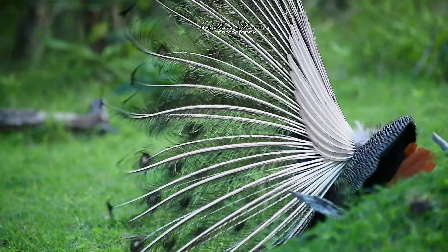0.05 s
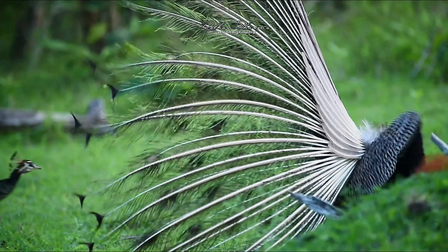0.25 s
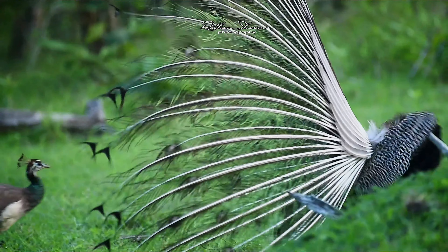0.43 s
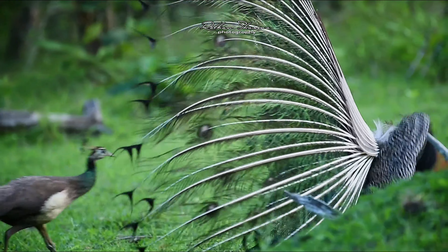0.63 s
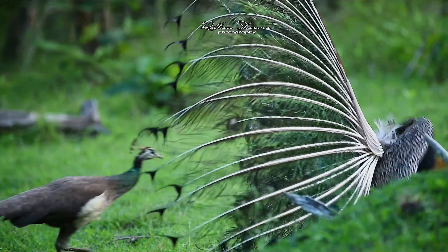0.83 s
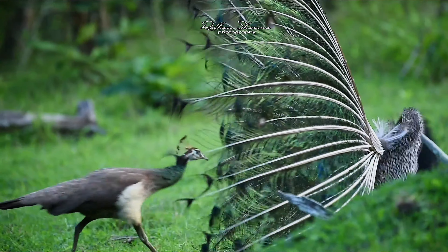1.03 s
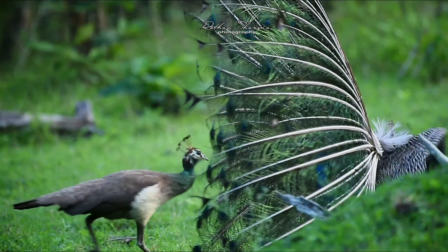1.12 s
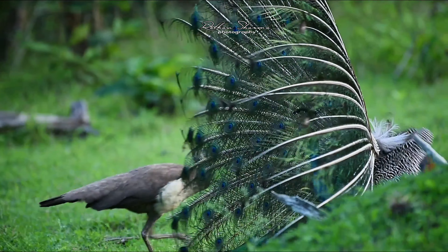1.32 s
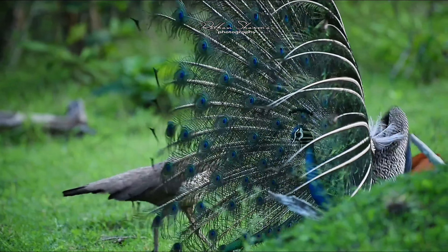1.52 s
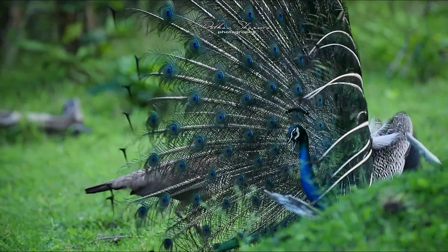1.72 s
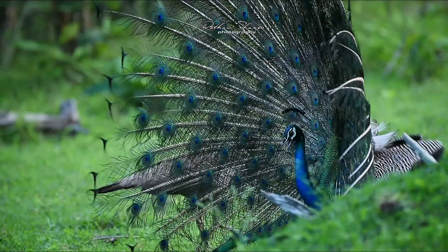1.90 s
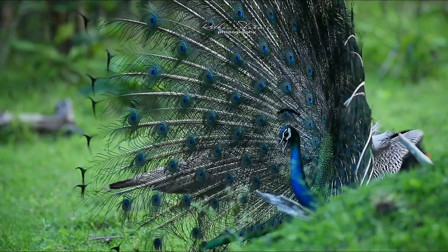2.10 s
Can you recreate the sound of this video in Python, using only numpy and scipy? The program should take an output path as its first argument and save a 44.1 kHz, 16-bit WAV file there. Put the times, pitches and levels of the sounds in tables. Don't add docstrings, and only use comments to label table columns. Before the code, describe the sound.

Outdoors in a grassy clearing, a peacock cries loudly twice, first long, then brief; each bright, nasal call leaves a diffuse woodland tail above barely audible air and insects, captured by a stereo microphone.

```python
import sys
import numpy as np
from scipy import signal
from scipy.fft import rfft, irfft
from scipy.io import wavfile
from scipy.ndimage import uniform_filter1d, map_coordinates

SR = 44100
rng = np.random.default_rng(int(sys.argv[2]) if len(sys.argv) > 2 else 0)


def volts_from_decibels(level):
    exponent = np.asarray(level, float) / 20
    return 10 ** exponent


def persist_wave(psi):
    counts = np.round(np.clip(psi, -1, 1) * 32767).astype(np.int16)
    wavfile.write(sys.argv[1], SR, np.atleast_2d(counts).T)


N = 94815

# freq_hz, density_db_per_hz
AIR_SPECTRUM = [(30, -9), (300, -10.5), (850, -15), (1300, -8), (2200, -16), (4400, -15.5), (8400, -11),
                (15000, -34.5)]
AIR_DB, AIR_APART_HZ, AIR_SIDE_DB = -50.5, 1410, -0.39
DUCK_DB, DUCK_HZ = -12, 700

# time_s, pitch_hz
PITCH_1 = [
    (.115, 521),
    (.2, 548),
    (.3, 595.4),
    (.345, 619.7),
    (.42, 631.1),
    (.6, 639.3),
    (.77, 640.5),
    (.88, 609.6),
    (1.015, 554.5),
    (1.05, 515.3),
]
PITCH_2 = [
    (1.29, 536),
    (1.34, 564.6),
    (1.44, 602),
    (1.5, 634),
    (1.56, 641.1),
    (1.65, 641.5),
    (1.72, 624.1),
    (1.785, 590),
    (1.9, 515.3),
]
# time_s, level_db, beak_ring_db, brightness_db_per_octave
CALL_1 = [
    (0.117, -44.5, 9, -18),
    (.17, -36.5, 8.5, -8),
    (0.248, -27.5, 5, -1),
    (0.399, -20, 9, 0),
    (.5, -20, 4.5, 1),
    (.7, -16, -5.5, 0.5),
    (.82, -19, -3.5, -4),
    (.92, -23.5, -0.5, 0.5),
    (1.051, -28, 0.5, -4),
]
CALL_2 = [
    (1.29, -38.5, -0.5, -4.5),
    (1.341, -27.5, 7.5, -6),
    (1.398, -23.5, 7, 1.5),
    (1.45, -23, -1, 0),
    (1.53, -20, 5.5, -1.5),
    (1.649, -19, 2, -3.5),
    (1.72, -23, -8, -4),
    (1.802, -24.5, -2.5, 1.5),
    (1.898, -33, -11, -4),
]
# open_s, shut_s, beak_ring_hz
SNAPS = [
    (0.307, 0.876, 7800),
    (1.45, 1.73, 6170),
]
# shut_hz, open_hz, width_hz, shut_db, open_db
THROAT = [(1065, 1560, 790, -7.5, -13), (1590, 2100, 370, -3, -29), (2416, 1950, 420, -1, 2.5),
          (3065, 3368, 550, -3.5, -7), (4303, 4650, 510, -17, -19), (5290, 5140, 1200, -15, -14),
          (6500, 6700, 1120, -16.5, -14), (7910, 8370, 1360, -19.5, -17), (9610, 10060, 2270, -23.5, -19.5),
          (12800, 10700, 4900, -40, -35.5)]
SNAP_S, ATTACK_S, RELEASE_S = 0.008, 0.006, 0.012
SNAP_LIFT_HZ = 12
SNAP_DULL_DB_PER_OCTAVE, SNAP_DULL_S = -6, 0.058
SLACK_HZ, SLACK_FOLLOW = 590, 0.51
FUNDAMENTAL_DB, WANDER_DB, SHIMMER_DB = -16.5, 3.5, 0.6
CHOKE_S, CHOKE_DB = 0.035, -16
JITTER, SHUT_JITTER, FALL_JITTER = 0.0005, 0.005, 0.005
BREATH_DB, SHUT_BREATH_DB = -44, 17

# freq_hz, t60_s, level_db
TREES = [(556, 1.34, -10.5), (1165, 1.64, -7.5), (2160, 1.57, -11), (3460, 1.56, -9.5), (4630, 1.6, -4.5),
         (8640, 1.03, -9), (13200, .7, -6)]
TREES_RISE_S, FAR_ECHO_S, FAR_ECHO_WIDTH_S, FAR_ECHO_DB = 0.034, 0.368, 0.013, -7
NEAR_DB, NEAR_T60_S, NEAR_RISE_S = 1.5, 0.35, 0.0027
SWAY_S, SWAY_RATE_HZ = 0.00009, 5
PORTS_APART_HZ, SIDE_DB, PAN_DB = 1300, 1.5, -2
MIC_DIP_HZ, MIC_DIP_DB, TOP_HZ = 6900, -6, 15550


def shape(x, gain):
    hz = np.fft.rfftfreq(x.shape[-1], 1 / SR) + 1
    return irfft(rfft(x) * gain(hz), x.shape[-1])


def on_log(hz, points, col):
    p = np.array(points, float)
    return np.interp(np.log(hz), np.log(p[:, 0]), p[:, col])


def walk(rate_hz, size=N):
    k = int(SR / rate_hz)
    held = np.repeat(rng.standard_normal(size // k + 1), k)
    return 1.405 * uniform_filter1d(uniform_filter1d(held, k), k)[:size]


def stereo(mid, side, apart_hz, side_db):
    side = shape(side, lambda hz: volts_from_decibels(side_db) / (1 + (apart_hz / hz) ** 4))
    return np.array([mid + side, mid - side])


def air(bird):
    noise = rng.standard_normal((2, N))
    mid, side = shape(noise, lambda hz: volts_from_decibels(on_log(hz, AIR_SPECTRUM, 1))) * volts_from_decibels(1.0 * walk(4.8))
    low = shape(mid, lambda hz: 1 / (1 + (hz / DUCK_HZ) ** 8))
    bird_level = uniform_filter1d(np.abs(bird), size=2000)
    duck = volts_from_decibels(DUCK_DB * np.tanh(30 * bird_level))
    ducked_mid = low + duck * (mid - low)
    return stereo(ducked_mid, duck * side, AIR_APART_HZ, AIR_SIDE_DB) * volts_from_decibels(AIR_DB) / mid.std()


def throat(hz, opened):
    power, turn = 0, 0
    for j, (shut_hz, open_hz, width_hz, shut_db, open_db) in enumerate(THROAT):
        centre_hz = shut_hz + (open_hz - shut_hz) * opened
        level = volts_from_decibels(shut_db + (open_db - shut_db) * opened)
        ring = 1j * width_hz * hz / (centre_hz ** 2 - hz ** 2 + 1j * width_hz * hz)
        power = power + level ** 2 * np.abs(ring) ** 4
        turn = turn + (-1) ** j * level * ring
    return np.sqrt(power) * turn / np.abs(turn)


def partial_gains(call, snap, s, hz, opened):
    c = np.array(call, float)
    level_db, ring_db, tilt_db = (np.interp(s, c[:, 0], c[:, j]) for j in (1, 2, 3))
    open_s, _, beak_hz = snap
    tilt_db = tilt_db + SNAP_DULL_DB_PER_OCTAVE * opened * np.exp(-((s - open_s) / SNAP_DULL_S) ** 2)
    f = np.arange(1, 27)[:, None] * hz
    slack = np.maximum(SLACK_HZ / hz, 1) ** SLACK_FOLLOW
    gain = throat(f * slack, opened) * volts_from_decibels(tilt_db * np.log2(1 + f / 3500)) * (f < TOP_HZ)
    gain *= volts_from_decibels(ring_db * np.exp(-(np.log2(f / beak_hz) / 0.68) ** 2))
    gain[0] = volts_from_decibels(FUNDAMENTAL_DB)
    gain[:3] *= volts_from_decibels(CHOKE_DB * np.clip(1 - (s[-1] - s) / CHOKE_S, 0, 1))
    loudness = np.sqrt(np.sum(np.abs(gain[:6]) ** 2, axis=0) / 2)
    return gain * volts_from_decibels(level_db) / loudness


def wail(pitch, call, snap):
    p = np.array(pitch, float)
    i = np.arange(int(p[0, 0] * SR), int(p[-1, 0] * SR))
    t = i / SR
    open_s, shut_s, _ = snap
    opened = (np.tanh((t - open_s) / SNAP_S) - np.tanh((t - shut_s) / SNAP_S)) / 2
    hz = uniform_filter1d(np.interp(t, *p.T), size=900, mode="nearest")
    hz = hz + SNAP_LIFT_HZ * uniform_filter1d(opened, size=900)
    rough = (SHUT_JITTER + FALL_JITTER * (t > shut_s)) * (1 - opened)
    jitter = JITTER * walk(40.16)[i] + rough * walk(200)[i]
    phase = 2 * np.pi * np.cumsum(hz * (1 + jitter)) / SR

    s = t[::32]
    breath_gain = volts_from_decibels(BREATH_DB + SHUT_BREATH_DB * (1 - opened))
    voice = 0
    for m, g in enumerate(partial_gains(call, snap, s, hz[::32], opened[::32]), 1):
        g = np.interp(t, s, g.real) + 1j * np.interp(t, s, g.imag)
        flutter = walk(250, size=len(t)) + 1j * walk(250, size=len(t))
        breath = 1 + breath_gain * m ** 0.5 * flutter
        wander = volts_from_decibels(WANDER_DB * min(m / 8, 1) * walk(11.77, size=len(t)))
        voice = voice - (g * breath * wander * np.exp(1j * m * phase)).real
    edge = np.clip((t - t[0]) / ATTACK_S, 0, 1) * np.clip((t[-1] - t) / RELEASE_S, 0, 1)
    out = np.zeros(N)
    out[i] = voice * edge * volts_from_decibels(SHIMMER_DB * walk(24.96)[i])
    return out


def trees():
    t, out = np.arange(N) / SR, 0
    for hz, t60_s, db in TREES:
        noise = rng.standard_normal((2, N))
        band = shape(noise, lambda f: np.exp(-(np.log2(f / hz) / 0.77) ** 2))
        out = out + band * volts_from_decibels(db - 60 * t / t60_s) * np.sqrt(14 / t60_s / SR)
    far_echo = 1 + volts_from_decibels(FAR_ECHO_DB) * np.exp(-((t - FAR_ECHO_S) / FAR_ECHO_WIDTH_S) ** 2)
    far = far_echo * (1 - np.exp(-t / TREES_RISE_S))
    near = volts_from_decibels(NEAR_DB - 60 * t / NEAR_T60_S) * (1 - np.exp(-t / NEAR_RISE_S))
    return out * (far + near) * volts_from_decibels(1.72 * walk(40.7))


def scene():
    bird = wail(PITCH_1, CALL_1, SNAPS[0]) + wail(PITCH_2, CALL_2, SNAPS[1])
    swayed = map_coordinates(bird, [np.arange(N) + SWAY_S * SR * walk(SWAY_RATE_HZ)])
    mid, side = signal.fftconvolve(trees(), swayed[None], axes=1)[:, :N]
    left, right = 0.85 * bird + stereo(mid, side, PORTS_APART_HZ, SIDE_DB)

    def lean_db(hz):
        return PAN_DB / (1 + (900 / hz) ** 4) / 2

    left = shape(left, lambda hz: volts_from_decibels(lean_db(hz)))
    right = shape(right, lambda hz: volts_from_decibels(-lean_db(hz)))
    return np.array([left, right]) + air(bird)


def top_cut(x):
    return signal.sosfilt(signal.butter(12, 15530, fs=SR, output="sos"), x)


def record(dry):
    def colour(hz):
        return volts_from_decibels(MIC_DIP_DB * np.exp(-((hz - MIC_DIP_HZ) / 150) ** 2)) * (hz < TOP_HZ)

    mix = shape(dry, colour)
    return top_cut(mix)


dry = scene()
out = record(dry)
persist_wave(out)
```